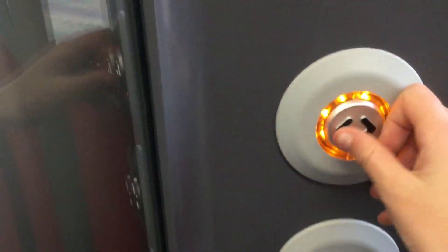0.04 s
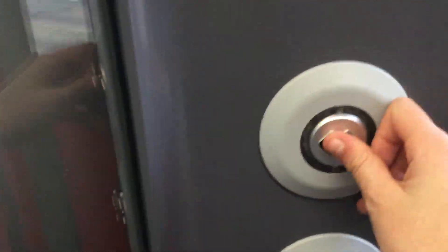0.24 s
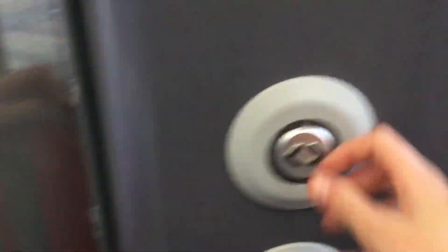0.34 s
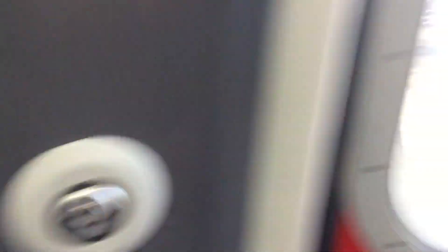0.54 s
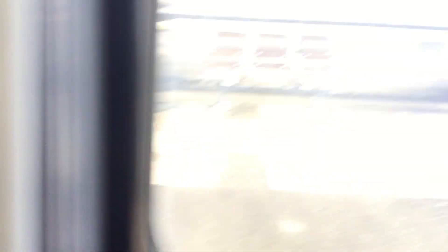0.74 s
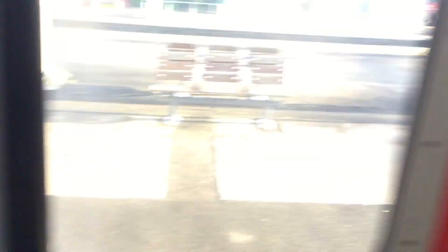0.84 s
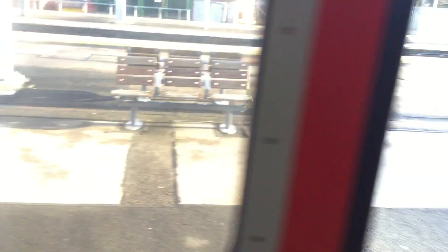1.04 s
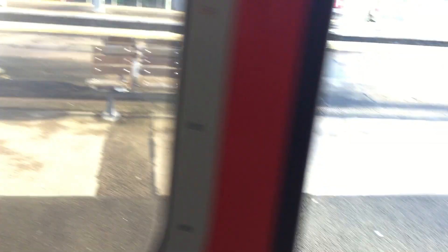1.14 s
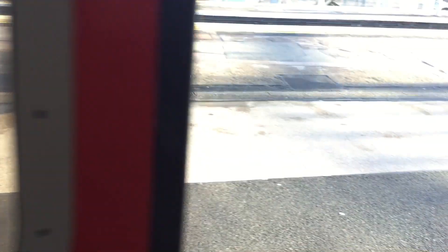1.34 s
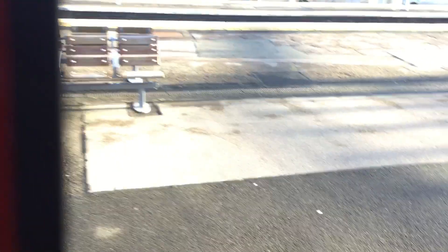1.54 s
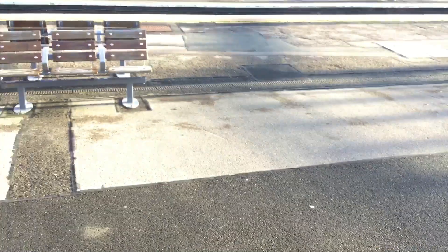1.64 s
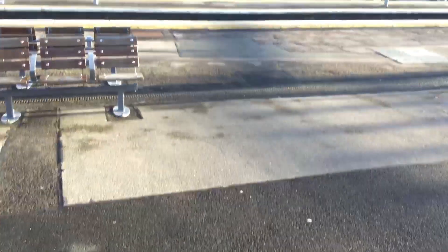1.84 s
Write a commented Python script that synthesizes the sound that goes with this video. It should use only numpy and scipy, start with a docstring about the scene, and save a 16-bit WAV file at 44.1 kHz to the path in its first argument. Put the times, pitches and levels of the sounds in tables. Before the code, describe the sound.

A pneumatic train door opens close to the microphone inside a humming carriage. A sharp button click sets off a loud, fading air hiss and a clunk, then the door rumbles and rattles aside, letting in faint outdoor noise.

```python
"""A door button clicks over the rumble and hum of a standing train. A valve opens and compressed air
hisses out as a turbulent jet, dying away as the pressure falls, while the air cylinder thuds and groans.
The lock lets go with a clunk that excites the modes of the door leaf, and the door slides open:
the leaf booms, the drive whines faintly, the rollers knock along the ringing track, the seal brushes
the body and outdoor noise comes in through the gap."""
import sys
import numpy as np
from scipy import signal
from scipy.fft import rfft, irfft
from scipy.io import wavfile

SR = 44100
rng = np.random.default_rng(int(sys.argv[2]) if len(sys.argv) > 2 else 0)


def waveform_to_disk(signal):
    """Save audio, clipped to [-1, 1], as 16-bit WAV at the path in sys.argv[1]."""
    frames = np.transpose(np.atleast_2d(signal))
    scaled = np.clip(frames, -1, 1) * 32767
    samples = np.round(scaled).astype(np.int16)
    wavfile.write(sys.argv[1], SR, samples)


N = 83790
T = np.arange(N) / SR


def from_db(db):
    """Decibels to amplitude ratio."""
    return 10 ** (np.asarray(db) / 20)


def rms_one(x):
    """Normalisation to unit power."""
    return x / np.sqrt(np.mean(x ** 2) + 1e-20)


def level(rows):
    """Amplitude envelope through (time_s, level_db) points."""
    return from_db(np.interp(T, *np.transpose(rows)))


def noise(spectrum, tilt_db=0):
    """Spectral shaping: unit-power noise of a given colour, tilted by tilt_db per octave above 250 Hz."""
    hz, db = np.transpose(spectrum)
    octave = np.log2(np.maximum(np.fft.rfftfreq(N, 1 / SR), 1) / 1000)
    gain = from_db(np.interp(octave, np.log2(hz / 1000), db) + tilt_db * np.maximum(octave, -2))
    return rms_one(irfft(rfft(rng.standard_normal(N)) * gain, N))


def resonance(hz, width_hz):
    """A two-pole resonator driven by white noise, at unit power."""
    radius = np.exp(-np.pi * width_hz / SR)
    feedback = [1, -2 * radius * np.cos(2 * np.pi * hz / SR), radius * radius]
    return rms_one(signal.lfilter([1, 0, -1], feedback, rng.standard_normal(N)))


def decay(start_s, t60_s):
    """Exponential decay from 1, losing 60 dB in t60_s."""
    return (T >= start_s) * np.exp(-np.log(1000) * np.maximum(T - start_s, 0) / t60_s)


def rise(start_s, length_s):
    """Linear ramp from 0 to 1."""
    return np.clip((T - start_s) / length_s, 0, 1)


def ring(start_s, hz, db, t60_s):
    """Free vibration of one struck mode: a damped sine."""
    return from_db(db) * decay(start_s, t60_s) * np.sin(2 * np.pi * hz * (T - start_s))


def drift(per_s):
    """Slow band-limited random motion of unit power."""
    return rms_one(signal.resample(rng.standard_normal(size=int(per_s * N / SR)), N))


def tone(hz, wander):
    """Frequency modulation: a unit-power sine whose pitch drifts by the fraction wander."""
    return np.sqrt(2) * np.sin(2 * np.pi * hz * np.cumsum(1 + wander * drift(per_s=25)) / SR)


# Spectrum of the carriage rumble: frequency_hz, relative_db
RUMBLE_COLOUR = [(30, -22), (80, -9), (130, 0.5), (280, -1), (500, -21), (1200, -22.5), (2200, -33.5),
                 (6000, -36), (10000, -41), (16000, -48)]
# Tones of the hum: pitch_hz, level_db
HUM_TONES = [(197, -50.5), (845, -67.5), (1675, -67.5)]
def carriage():
    """Superposition of steady broadband rumble and a tonal hum."""
    rumble = from_db(-44.5) * noise(RUMBLE_COLOUR)
    return rumble + sum(from_db(db) * tone(hz, wander=0.0029) for hz, db in HUM_TONES)


# Spectrum of the outdoor noise: frequency_hz, relative_db
OUTDOOR_COLOUR = [(50, -1), (200, -10), (290, 5), (400, 1), (520, -6), (750, -9), (1100, -15), (1600, -16),
                  (2200, -22), (5000, -28.5), (16000, -55)]
def outdoors():
    """Transmission through an aperture: the widening gap lets in more outdoor noise."""
    return from_db(-47.5) * rise(1.01, length_s=0.61) * noise(OUTDOOR_COLOUR)


# Envelope of the brushing seal: time_s, level_db
SEAL_LEVEL = [(1.3, -78), (1.46, -78), (1.52, -54), (1.58, -57), (1.655, -55), (1.70, -74), (1.82, -68),
              (1.87, -58), (1.9, -64)]
# Its spectrum: frequency_hz, relative_db
SEAL_COLOUR = [(1000, -18), (3000, 0), (6000, -2.5), (7600, -5), (8500, -5), (10000, -12), (13000, -14),
               (16000, -21)]
def seal():
    """Sliding friction: the door seal makes a soft hiss along the body."""
    return level(SEAL_LEVEL) * noise(SEAL_COLOUR)


# Envelope of the drive's whine: time_s, level_db
WHINE_LEVEL = [(.8, -70), (.95, -48), (1.12, -43), (1.2, -49), (1.4, -52), (1.9, -52.5)]
def drive():
    """Periodic vibration of the drive gives a faint, wavering whine."""
    return level(WHINE_LEVEL) * tone(361, wander=0.016)


# Envelope of the leaf's boom: time_s, level_db
BOOM_LEVEL = [(.6, -80), (.78, -41.5), (.93, -33), (.955, -23.5), (1.0, -23.5), (1.04, -33), (1.12, -30.5),
              (1.22, -37.5), (1.33, -48), (1.38, -34), (1.485, -31), (1.52, -51.5), (1.9, -44)]
# Bumps of the leaf in its guides: start_s, pitch_hz, level_db
GUIDE_BUMPS = [(1.076, 99, -29), (1.299, 91, -24.5), (1.373, 104, -25), (1.70, 85, -28.5)]
def sliding_leaf():
    """Panel resonance: the moving leaf booms on one low note and bumps softly in its guides."""
    bumps = sum(rise(s, length_s=0.013) * ring(s, hz, db, t60_s=0.21) for s, hz, db in GUIDE_BUMPS)
    return bumps + level(BOOM_LEVEL) * tone(149, wander=0.018)


# Envelope of the rolling door's rumble: time_s, level_db
ROLLING_LEVEL = [(0, -77), (.48, -70), (.55, -33), (.7, -48), (.85, -36), (1.0, -34), (1.1, -40.5),
                 (1.21, -37.5), (1.33, -41), (1.48, -35), (1.55, -47.5), (1.66, -44), (1.72, -45),
                 (1.9, -59)]
# Its spectrum: frequency_hz, relative_db
ROLLING_COLOUR = [(25, -32), (58, -2.5), (102, 2), (125, -0.5), (200, -7.5), (290, -21), (650, -19),
                  (1300, -23.5), (2500, -32), (8000, -52), (16000, -73)]
def rolling():
    """Rolling contact gives a low noise that swells and ebbs as the door travels."""
    return level(ROLLING_LEVEL) * noise(ROLLING_COLOUR)


# Clinks of loose fittings: start_s, pitch_hz, level_db
FITTING_CLINKS = [(0.921, 2120, -39.5), (0.984, 2120, -45), (1.496, 2110, -41), (1.497, 3450, -46),
                  (1.513, 2150, -45.5), (1.782, 1530, -42)]
def fittings():
    """Damped resonance: each small fitting clinks in one narrow band."""
    return sum(from_db(db) * decay(s, t60_s=0.13) * resonance(hz, width_hz=145)
               for s, hz, db in FITTING_CLINKS)


# Roller impacts: start_s, gain_db, brightness_db_per_octave
ROLLER_KNOCKS = [(.897, -9, -4), (.924, -13, 2.5), (.980, -6.5, -4.5), (1.052, -6.5, -2), (1.163, -6, -3),
                 (1.251, -5, -3), (1.355, 1, 1), (1.371, -10, -2), (1.4283, -2, 1.5), (1.444, -7.5, -1),
                 (1.474, -10.5, -1), (1.534, -15.5, -2), (1.652, -18, -2.5)]
# Modes of the track: pitch_hz, relative_db, t60_s
TRACK_MODES = [(560, -30, 0.058), (685.5, -27.5, 0.12), (800, -19.5, 0.011), (932, -27.5, 0.062),
               (1199, -34.5, .17), (1474, -36.5, 0.1), (2870, -38, 0.077)]
# Spectrum of a knock's crack and tail: frequency_hz, relative_db
CRACK_COLOUR = [(150, 0.5), (420, -3.5), (650, 4.5), (800, -7), (1200, -1), (1650, -9.5), (2100, -21),
                (3000, -14), (4200, -26), (8500, -51), (16000, -67)]
def rollers(scatter_db=2, pivot_hz=800):
    """Impact excitation: each knock is a crack with a short tail, and sets the track's modes ringing."""
    out = np.zeros(N)
    for s, gain_db, bright_db in ROLLER_KNOCKS:
        burst = from_db(-22) * decay(s, t60_s=0.021) + from_db(-35) * decay(s, t60_s=0.39)
        track = 0
        for k, (hz, db, t60_s) in enumerate(TRACK_MODES):
            struck_db = db + bright_db * np.log2(hz / pivot_hz) + scatter_db * rng.standard_normal()
            track += (-1) ** k * ring(s, hz, struck_db, t60_s)
        crack = burst * noise(CRACK_COLOUR, bright_db)
        out += from_db(gain_db) * rise(s, length_s=0.0011) * (crack + track)
    return out


# Contacts in the lock: start_s, relative_db
LOCK_CONTACTS = [(0.5039, -3), (.513, 1.5), (0.537, -2), (0.556, -11)]
# Spectrum of the clunk: frequency_hz, relative_db
CLUNK_COLOUR = [(60, -4.5), (220, 3.5), (400, 4), (500, -8), (700, -3.5), (1050, -6), (1400, -21),
                (2500, -20), (8000, -52)]
# Modes of the door leaf: pitch_hz, level_db, t60_s, build_up_s
LEAF_MODES = [(148.1, -18, 0.52, 0.023), (306.6, -15, 0.178, 0.03), (599, -17, 0.14, 0.01),
              (720, -21.5, .15, 0.0096), (930, -30, 0.16, 0.0061), (1028, -21.5, 0.057, 0.0037),
              (1310, -29.5, 0.15, 0.0031)]
def lock(leaf_s=0.505):
    """Modal response: quick contacts ring the leaf, low modes last, and the vestibule reverberates."""
    blows = sum(from_db(-20 + db) * decay(s, t60_s=0.077) for s, db in LOCK_CONTACTS)
    vestibule = from_db(-33.5) * decay(leaf_s, t60_s=0.4) * noise(CLUNK_COLOUR)
    leaf = 0
    for hz, db, t60_s, build_s in LEAF_MODES:
        build_loss = np.exp(-np.log(1000) * build_s / t60_s)  # decay during the build-up
        leaf += rise(leaf_s, build_s) ** 2 * ring(leaf_s, hz, db, t60_s) / build_loss
    return blows * noise(CLUNK_COLOUR) + vestibule + leaf


# Spectra of the snap and of the hollow behind the button: frequency_hz, relative_db
SNAP_COLOUR = [(300, -14), (1000, -25), (2200, -12), (3000, -4.5), (4200, -9), (5700, 4), (7000, -4),
               (7800, -22), (8800, -2.5), (11000, -16), (16000, -16)]
HOLLOW_COLOUR = [(100, -23), (220, 4), (330, 11.5), (480, -5), (640, -5), (800, -14.5), (1100, -36),
                 (3000, -54)]
# Modes of the metal button and of its panel: pitch_hz, level_db, t60_s
METAL_MODES = [(1370, -46, 0.13), (3070, -29.5, 0.063), (3680, -38, 0.17), (6140, -47, 0.1)]
BUTTON_PANEL_MODES = [(198.3, -21.5, 0.17), (291.7, -25, 0.26), (431, -22, 0.11), (530, -20, 0.037)]
def button(press_s=0.2283, panel_lag_s=0.0031):
    """Impulse response: a bright snap rings the metal, then the panel and the cavity behind it."""
    snap = from_db(-17.5) * noise(SNAP_COLOUR) * decay(press_s, t60_s=0.023)
    tail = from_db(-33) * noise(SNAP_COLOUR, tilt_db=-4) * decay(press_s, t60_s=0.27)
    metal = sum(ring(press_s, *mode) for mode in METAL_MODES)
    knock_s = press_s + panel_lag_s
    panel = sum((-1) ** k * ring(knock_s, *mode) for k, mode in enumerate(BUTTON_PANEL_MODES))
    hollow = from_db(-29.5) * noise(HOLLOW_COLOUR) * decay(knock_s, t60_s=0.65)
    return snap + tail + metal + panel + hollow


VALVE_OPEN_S, AIR_ATTACK_S = 0.2984, 0.017

# Modes of the air cylinder's thud: pitch_hz, level_db, t60_s
THUD_MODES = [(81.5, -25.5, .16), (169.4, -26, 0.22)]
# Spectrum of its groan: frequency_hz, relative_db
GROAN_COLOUR = [(40, -50), (120, -10.5), (195, 3.5), (280, -5), (400, -14), (700, -23.5), (2000, -55)]
def cylinder(thud_s=0.309):
    """Step response: the cylinder thuds and groans as air pressure pushes on the door."""
    groan = from_db(-24.5) * noise(GROAN_COLOUR) * decay(VALVE_OPEN_S, t60_s=1.33)
    thud = sum(ring(thud_s, *mode) for mode in THUD_MODES)
    return rise(VALVE_OPEN_S, AIR_ATTACK_S) * (groan + thud)


# Boundaries of the jet's bands: edge_hz
BAND_EDGES = [0, 2000, 3200, 5000, 7500, 9800, 13000, 22050]
def flutter(jet, spread_db=1.2):
    """Amplitude modulation: turbulence makes each band of the jet waver on its own."""
    hz, spectrum = np.fft.rfftfreq(N, 1 / SR), rfft(jet)
    bands = [irfft(spectrum * ((hz >= low) & (hz < high)), N)
             for low, high in zip(BAND_EDGES, BAND_EDGES[1:])]
    return sum(band * from_db(spread_db * drift(per_s=22.03)) for band in bands)


def housing(jet):
    """Reverberation: the housing adds a short, dense tail of echoes; the sum has unit power."""
    echoes = rng.standard_normal(N) * decay(0, t60_s=0.094)
    reflected = signal.fftconvolve(jet, echoes / np.linalg.norm(echoes))[:N]
    return rms_one(jet + from_db(-5) * reflected)


# Spectra of the jet at full and at eased pressure: frequency_hz, relative_db
FULL_JET_COLOUR = [(200, -2.5), (900, -8.5), (1350, -2), (1850, -11), (2400, 0), (3300, -1), (4300, -5),
                   (6500, -1), (8600, 0), (10300, -10), (11600, -5), (14000, -16), (16000, -4)]
EASED_JET_COLOUR = [(200, -9), (1800, -7), (2600, -2), (4900, -7.5), (5700, 1), (6900, 0.5), (7700, -3),
                    (8500, 1), (10100, -15), (12200, -6.5), (13800, -12.5), (16000, -23)]
# Faint whistles in the exhaust: pitch_hz, width_hz, level_re_jet_db
EXHAUST_WHISTLES = [(2317, 34, -19), (2794, 24, -33), (3013, 13, -21.5), (3300, 15, -21.5), (3876, 35, -34),
                    (6060, 70, -18), (6850, 29, -16.5), (8255, 23, -19), (8750, 23, -23)]
def air_jet(eased_s=1, fall_db_per_s=26):
    """Turbulent jet noise: a brief leak, then the valve opens and the hiss fades with the pressure."""
    eased = rise(VALVE_OPEN_S, eased_s - VALVE_OPEN_S)
    covered = rise(1.12, length_s=0.35)  # the leaf slides past and shades the top treble
    lowpass = signal.butter(4, 9600, fs=SR, output="sos")
    shaded = signal.sosfilt(lowpass, noise(EASED_JET_COLOUR, tilt_db=2.2))
    # Equal-power crossfades change the colour, not the level.
    late = np.sqrt(1 - covered) * noise(EASED_JET_COLOUR) + np.sqrt(covered) * shaded
    jet = housing(np.sqrt(1 - eased) * noise(FULL_JET_COLOUR) + np.sqrt(eased) * late)
    whistles = sum(from_db(db) * resonance(hz, width) for hz, width, db in EXHAUST_WHISTLES)
    flow = rise(VALVE_OPEN_S, AIR_ATTACK_S) * from_db(-23.5 - fall_db_per_s * (T - VALVE_OPEN_S))
    fade_out = 1 - rise(1.38, length_s=0.73)
    leak = from_db(-31.5) * decay(0.2847, t60_s=0.087) * noise(FULL_JET_COLOUR, tilt_db=-5)
    return flutter(jet + whistles) * flow * fade_out + leak


def scene():
    """Superposition of all sources in one channel, as heard just inside the door."""
    background = outdoors() + carriage()
    release = button() + air_jet() + cylinder() + lock()
    travel = sliding_leaf() + drive() + rolling() + seal() + rollers() + fittings()
    return (background + release + travel)[None]


def record(dry):
    """Band limiting by a small microphone: no deep bass, the top cut steeply."""
    thin = signal.sosfilt(signal.butter(4, 42, "high", fs=SR, output="sos"), dry)
    return signal.sosfilt(signal.ellip(12, .1, 90, 15800, fs=SR, output="sos"), thin)


dry = scene()
out = record(dry)
waveform_to_disk(out)
```